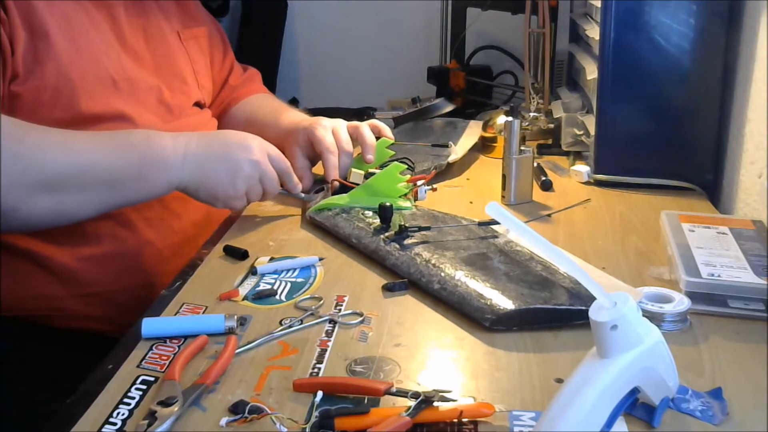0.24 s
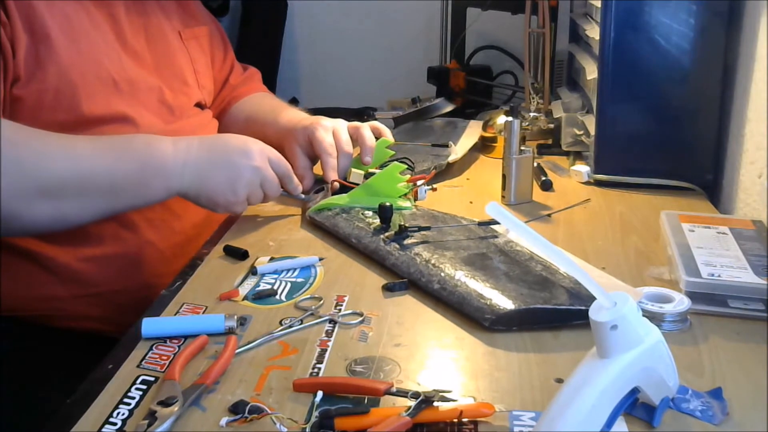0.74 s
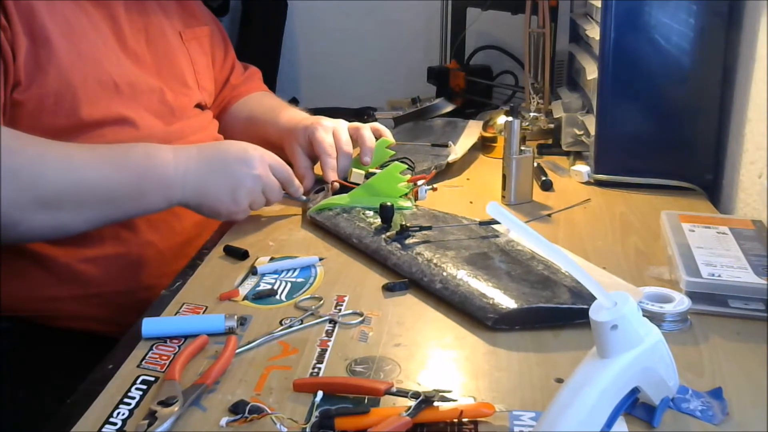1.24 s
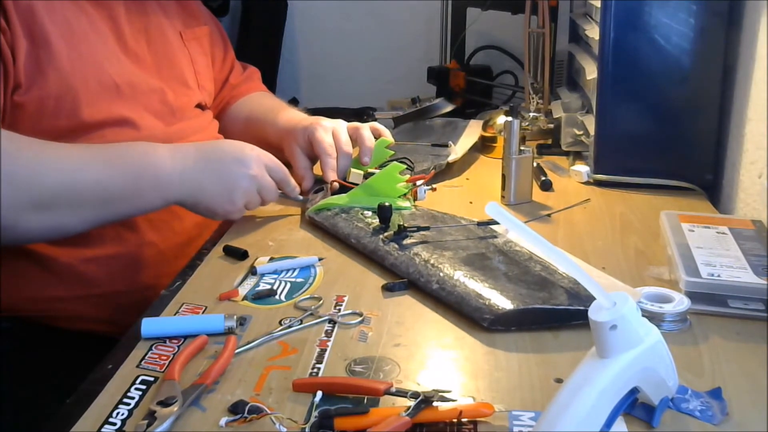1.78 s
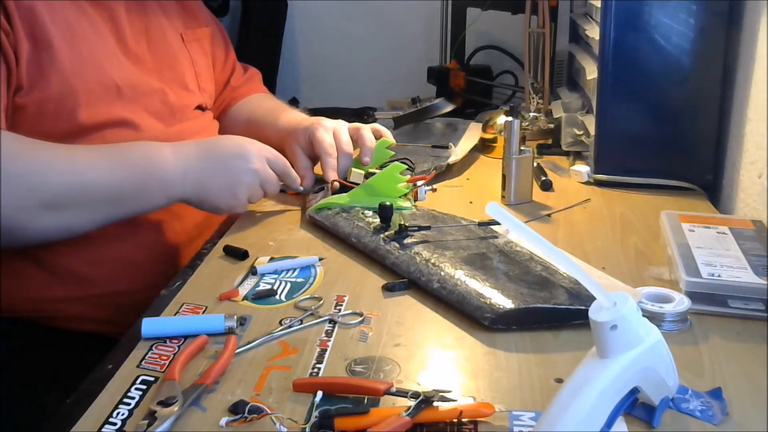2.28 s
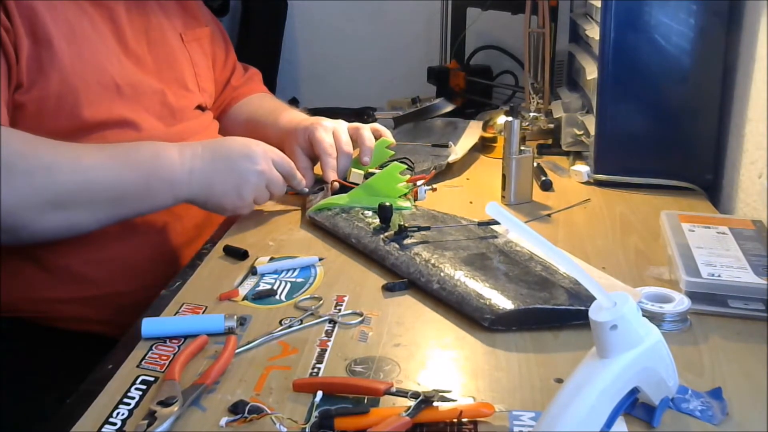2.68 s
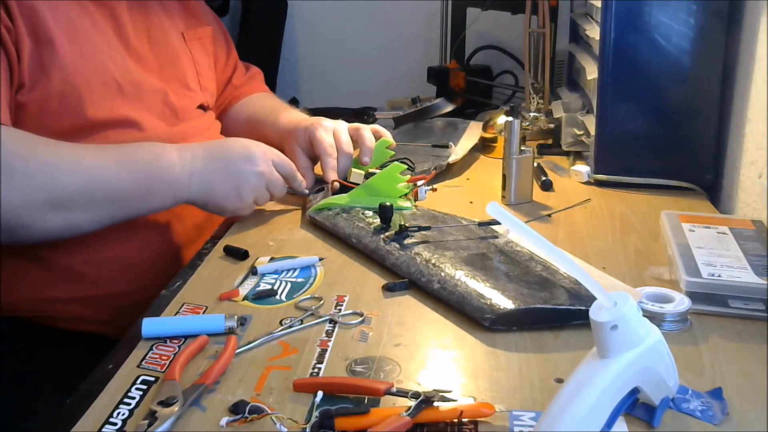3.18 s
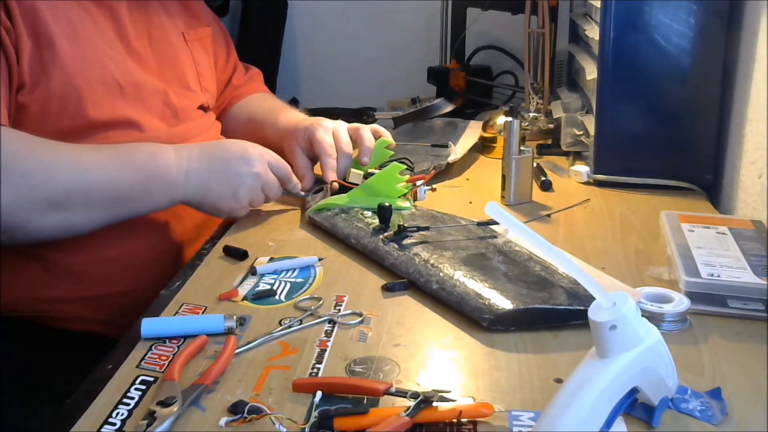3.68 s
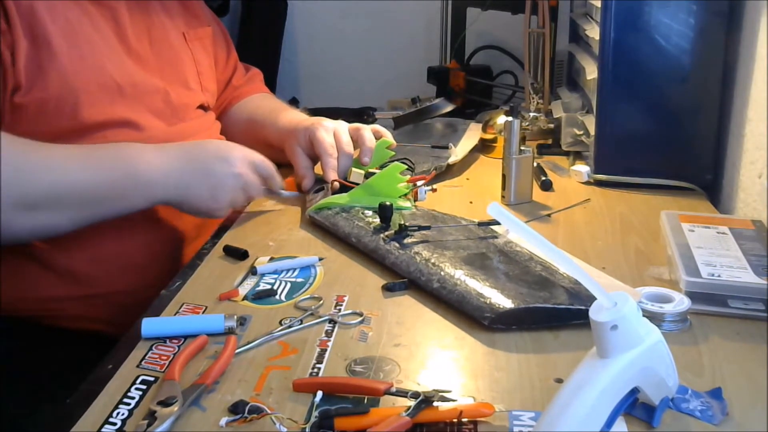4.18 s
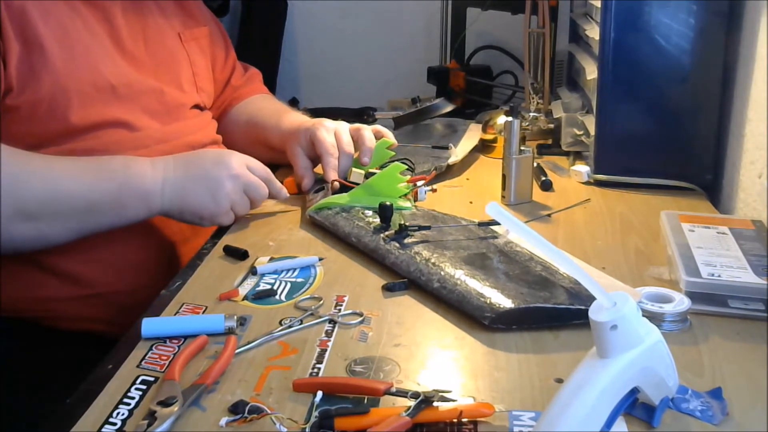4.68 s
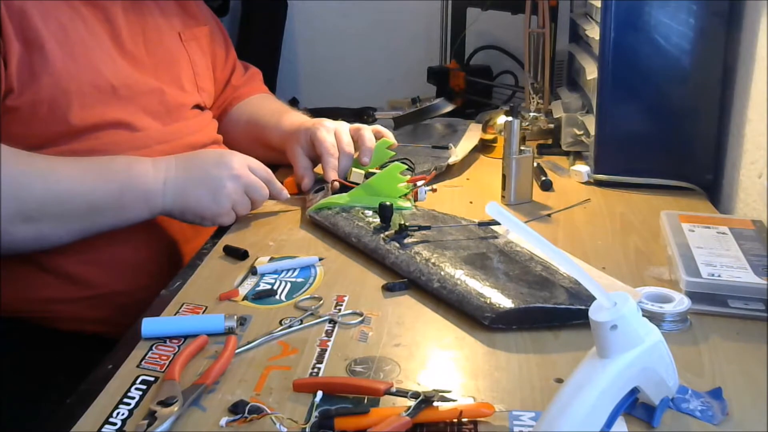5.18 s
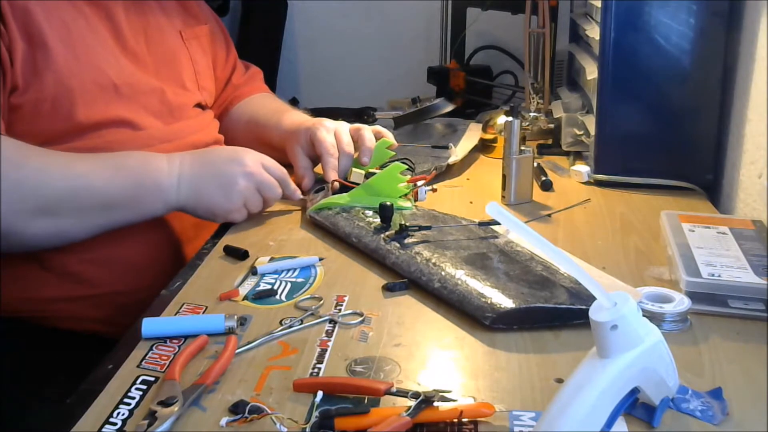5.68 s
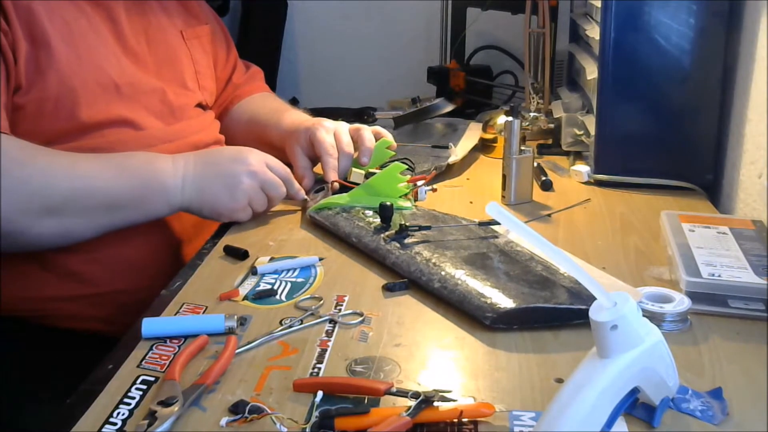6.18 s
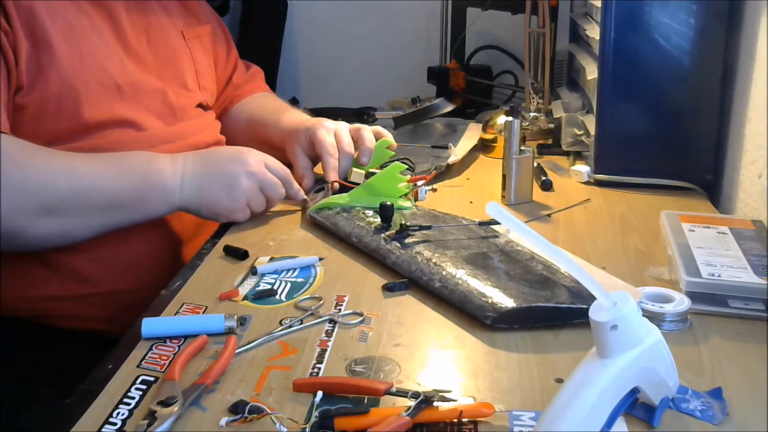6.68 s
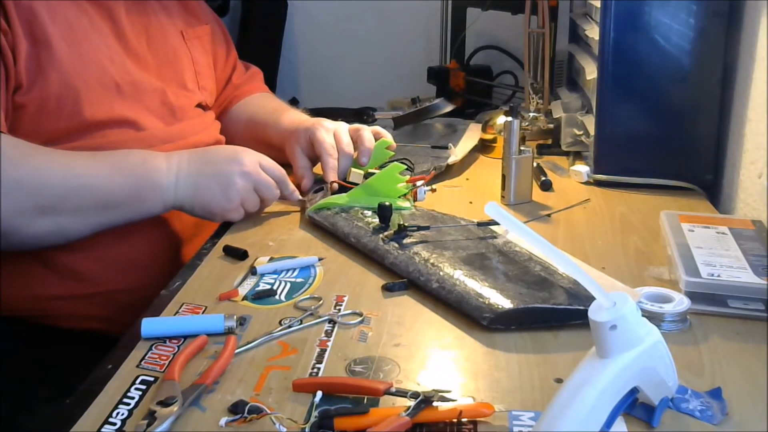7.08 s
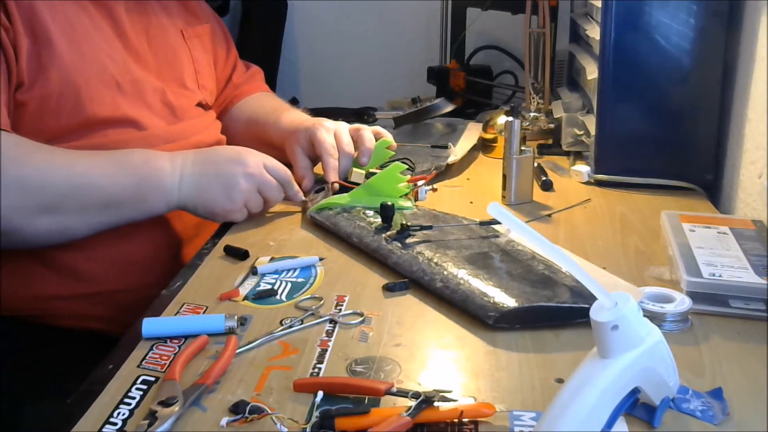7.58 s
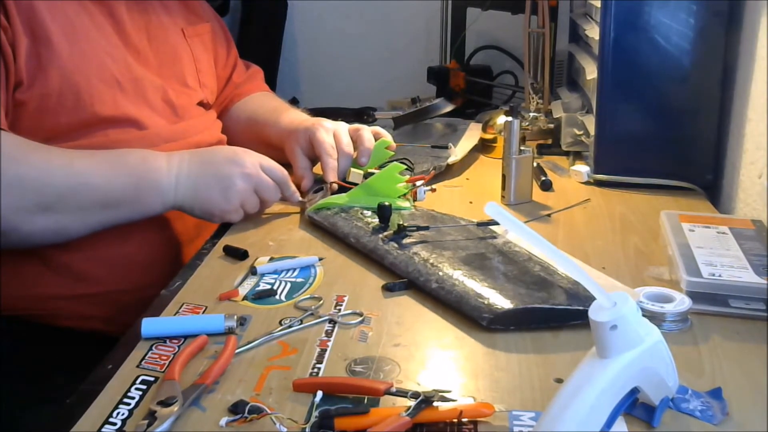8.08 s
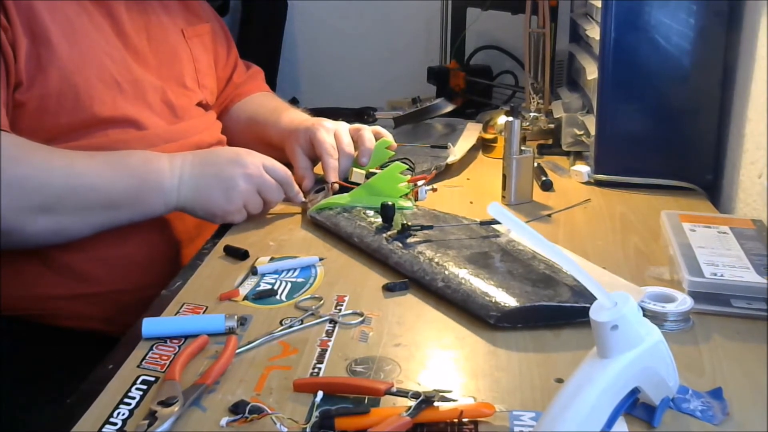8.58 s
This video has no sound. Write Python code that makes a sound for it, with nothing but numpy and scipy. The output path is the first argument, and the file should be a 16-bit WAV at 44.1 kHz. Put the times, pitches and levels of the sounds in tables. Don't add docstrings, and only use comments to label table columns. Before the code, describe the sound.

Close, dry workshop cutting: grainy foam sawing, sharp little cracks and ripping jerks, then quicker scraping with gentle bench knocks over a faint machine hum.

```python
import sys
import numpy as np
from scipy import signal
from scipy.fft import rfft, irfft
from scipy.io import wavfile
from scipy.ndimage import uniform_filter1d, map_coordinates

SR = 44100
rng = np.random.default_rng(int(sys.argv[2]) if len(sys.argv) > 2 else 0)


def wav_out(sig):
    wavfile.write(sys.argv[1], SR, np.round(np.clip(np.atleast_2d(sig).T, -1, 1) * 32767).astype(np.int16))


def boost(x):
    u = np.asarray(x, float) / 20
    return 10 ** u


N = 390285

# pitch_hz, level_db (per Hz)
HUM_COLOUR = [(12, -49), (20, -26), (90, -18), (109, -12), (232, -7.5), (259, -6.5), (333, -10.5),
              (405, -11), (506, -15), (707, -18), (934, -19.5), (8920, -34.5), (15600, -49.5)]
# pitch_hz, time_to_fall_60_db_s
ROOM_RING = [(500, 0.074), (2000, 0.11), (6500, 0.075), (12000, 0.1)]

# pitch_hz, level_db, time_to_fall_60_db_s
BOARD_TONES = [(382, 2, 0.11), (460.6, 4, 0.098), (323, -4, 0.19), (558.4, -8.5, 0.27)]
# pitch_hz, level_db, time_to_fall_60_db_s
FRAME_TONES = [(137, -2, 0.47), (198, 4.5, .2)]
# pitch_hz, level_db (per Hz)
GRIT_COLOUR = [(90, -30.5), (200, -5.5), (450, 4), (900, -4.5), (1500, -14.5), (3000, -37)]
# start_s, board_peak_db, frame_db, part_db
KNOCKS = [(0.365, -45, -23, 5.5), (0.467, -40, -18, -35), (0.546, -51, -21, 2.5), (0.732, -46.5, -4, -6),
          (0.786, -38.5, -17, 3.5), (0.946, -51, -9, -1), (0.991, -49.5, -39, -2), (1.204, -42.5, -20, 4),
          (1.239, -57, 1, 5.5), (1.388, -45.5, -6, -4.5), (1.451, -51.5, -22, -6.5), (1.542, -56, -27, -26),
          (1.566, -59, -5, -18), (2.792, -42, -12, -18), (3.088, -47.5, -4, -1), (3.446, -55, 3, 0.5),
          (3.582, -52.5, -7, -26), (3.641, -48.5, -4, 1), (3.759, -56, -19, -4), (3.822, -47.5, 4, -13.5),
          (4.031, -53.5, -32, -40.5), (5.755, -52.5, -13, -18.5), (5.856, -44.5, -19, -18),
          (5.946, -54, -10, -26), (6.668, -55, -23, -5.5)]
# start_s, board_peak_db, frame_db
ROCKING_KNOCKS = [(7.01, -46.5, -8.5), (7.186, -41.5, -7.5), (7.329, -50.5, -22), (7.469, -29.5, -7.5),
                  (7.654, -42.5, -1), (7.796, -30, -11), (7.959, -38, -8), (8.121, -28, -14),
                  (8.297, -45, -1), (8.459, -32, -18.5), (8.704, -55.5, 2.5)]
# start_s, peak_db, pitch_hz
PART_TAPS = [(.527, -46, 900), (.675, -58, 623), (0.71, -42, 726), (0.828, -37.5, 753), (2.689, -70, 720),
             (3.669, -47.5, 884), (4.253, -60, 696), (4.559, -63, 713), (4.668, -49, 854),
             (6.297, -52, 740), (6.447, -55.5, 717), (7.365, -45, 880), (7.777, -44, 833),
             (8.092, -49, 714), (8.401, -48, 764)]
# start_s, peak_db
FRAME_THUDS = [
    (.27, -56),
    (0.712, -55),
    (2.971, -62),
    (3.07, -53),
    (4.23, -57.5),
    (5.335, -63),
    (5.997, -54),
    (6.224, -61),
    (6.447, -60),
    (8.402, -52),
]

# pitch_hz, level_db (per Hz)
CRACK_COLOUR = [(1060, -51), (1800, -32.5), (2610, -12), (3540, -8), (5610, -1), (6720, 0.5), (9310, -16.5),
                (12800, -60), (14700, -54), (15600, -100)]
# start_s, peak_db, dull_part_db
FIBRE_SNAPS = [(0.8187, -14, -2), (1.1818, -41.5, 2.5), (1.2099, -10.5, -7), (2.3634, -15.5, -12.5),
               (2.392, -15.5, -5.5), (2.7954, -14.5, -24), (3.2838, -49, -8), (3.83, -12, -10.5),
               (4.0688, -21.5, -4.5), (4.1153, -15.5, -12.5), (5.6409, -15, -6), (6.099, -23.5, -11),
               (6.4731, -23.5, -20), (6.7143, -22.5, 2.8), (6.8154, -27.5, -7), (7.3278, -19.5, -11),
               (7.437, -34, -10), (7.468, -9.5, -9.5), (7.818, -13, -3), (7.975, -41, 9),
               (8.4615, -32.5, 12.7), (8.752, -39.5, -21)]
# start_s, peak_db
THIN_TICKS = [(0.1319, -33), (0.2213, -22.5), (0.3301, -44), (0.5815, -27), (0.5934, -12), (2.4834, -12),
              (2.8976, -33), (3.4745, -45), (3.9004, -38), (5.25, -33), (5.341, -30), (5.3695, -30),
              (5.3921, -30), (5.4085, -35), (5.4456, -33), (5.478, -32), (6.0038, -32), (6.694, -26),
              (7.1386, -24.5), (8.3025, -37), (8.7722, -15.5)]
# start_s, snap_db, tearing_db, run_out_s, weight_on_part_db
RIPS = [(1.8403, -6.5, -35.5, 0.082, -8), (2.444, -3.5, -36, .15, -7.5), (2.7504, 0.5, -33, 0.12, -12),
        (3.0985, 1, -30, 0.12, -14), (3.1615, 0.5, -34.5, 0.11, -15.5), (3.3529, -15.5, -35.5, 0.065, -4.5),
        (4.6182, -8.5, -40, 0.11, -6), (5.23, -28.5, -42.5, 0.082, -18), (5.2844, -12, -45.5, 0.11, -16.5),
        (8.1228, -25, -44.5, 0.062, 9.5), (8.7905, -4, -40.5, 0.34, -5.5)]

# pitch_hz, level_db (per Hz)
CELL_COLOUR = [(2000, -97), (4200, -5.5), (4900, 4), (5600, 5.5), (6500, 9), (7600, 1.5), (9000, -7),
               (11000, -52.5), (14000, -94.5)]
# pitch_hz, level_db (per Hz)
DRAG_COLOUR = [(200, -88.5), (560, -30.5), (850, -9.5), (1100, -9.5), (1450, -1.5), (1800, -9), (2200, -10),
               (3000, -32), (6000, -88)]
# pitch_hz, level_db (per Hz)
BLADE_COLOUR = [(800, -95.5), (1700, -45.5), (2300, -13), (2650, -9), (2900, -7.5), (3250, -7),
                (3800, -8.5), (4500, -7), (5500, -31), (9000, -93.5)]
# pitch_hz, level_db (per Hz)
FIZZ_COLOUR = [(5000, -86.5), (8000, -20.5), (9500, 11), (10500, -2), (12500, -16), (14500, -20),
               (15700, -28)]
# start_s, rise_s, hold_s, tearing_db, weight_on_part_db
BLADE_STROKES = [(0, 0.0007, 0.0009, -39.5, -11.5), (.11, 0.031, 0.001, -27.5, -17.5),
                 (0.309, 0.033, 0.03, -32, -10), (0.545, 0.036, 0.0067, -32, -13.5), (0.701, 0.1, 0.001, -61.5, 2),
                 (0.802, 0.017, 0.014, -45, -4), (0.961, .03, 0.051, -55, -5), (1.165, 0.043, 0.028, -37.5, -9),
                 (1.383, 0.036, 0.001, -73.5, 16), (1.605, 0.058, 0.21, -47.5, -4.5),
                 (2.268, 0.018, 0.025, -67, -41), (2.334, 0.043, 0.048, -42.5, -15.5),
                 (2.882, .03, 0.043, -37.5, -15), (3.036, 0.054, 0.001, -46.5, -34),
                 (3.265, 0.022, 0.038, -35, -19.5), (3.434, .048, 0.028, -43, -19.5),
                 (3.636, .038, 0.0014, -49, -7), (3.819, 0.0032, 0.1, -45, -17), (3.997, 0.086, 0.028, -39, -19),
                 (5.386, 0.026, 0.005, -41.5, -26), (5.47, 0.0074, .04, -40, -21),
            (5.453, 0.096, 0.11, -35.5, -12.5), (5.704, 0.0099, 0.1, -51, -50),
            (5.741, .11, 0.027, -48.5, -51), (5.983, 0.036, 0.077, -37.5, -10.5),
            (6.267, 0.015, 0.093, -68, -4), (6.428, 0.069, 0.001, -42.5, -10.5),
            (6.64, 0.07, 0.013, -48, -12.5), (6.797, 0.018, 0.031, -42, -10.5),
            (6.989, 0.028, 0.021, -43.5, -10.5), (7.126, 0.046, 0.022, -39, -6.5),
            (7.307, 0.026, 0.038, -46, -9), (7.441, 0.042, 0.034, -37, -5.5),
            (7.606, 0.054, 0.034, -42.5, -15.5), (7.74, 0.07, 0.012, -32, -10),
            (7.955, 0.031, 0.00087, -43, -8), (8.252, 0.071, 0.0011, -50, -6.5),
            (8.372, 0.12, 0.031, -43, -10.5), (8.573, 0.017, 0.15, -67, -16),
            (8.762, 0.012, 0.006, -43.5, -11)]

HUM_DB, HISS_DB = -67.5, -85.5
ROCK_PART_DB, PART_HZ, ASIDE_DB = -8.5, (651, 919), 14.5
GRIT_DB, GRIT_T60_S = -11, 0.21
TICK_DULL_DB, DULL_DB, DULL_FOLLOWS = -26, -3.5, 1.16
TOUCH_DB, REST_DB = -65, -73.5
SAG_DB_PER_S, RELEASE_PER_S = 22, 2.67
FREE_S = 0.0048
BLADE_DB, BLADE_FOLLOWS = -0.75, 0.36
FIZZ_DB, FIZZ_FOLLOWS = -19.5, 0.29
BANDS_DB = 2.5


def unit(x):
    return x / np.sqrt(np.mean(x ** 2) + 1e-20)


def along(points, hz):
    f, v = np.transpose(points)
    return np.interp(np.log(hz + 1), np.log(f + 1), v)


def wobble(rate):
    knots = rng.standard_normal(int(N * rate / SR) + 4)
    return map_coordinates(knots, [np.arange(N) * rate / SR])


def response(spectrum, size=1024):
    gain = np.maximum(boost(along(spectrum, np.fft.rfftfreq(size, 1 / SR))), 1e-4)
    cepstrum = irfft(np.log(gain))
    cepstrum[1:size // 2] *= 2
    cepstrum[size // 2 + 1:] = 0
    h = irfft(np.exp(rfft(cepstrum)))
    return h / np.linalg.norm(h)


def coloured(x, spectrum, size=1024):
    return signal.fftconvolve(x, response(spectrum, size=size))[:len(x)]


def tail(fade):
    hz, t, z = signal.stft(rng.standard_normal(SR // 5), SR, nperseg=128)
    decay_db = -60 * t / along(ROOM_RING, hz)[:, None] - 20 * (t / fade) ** 4
    h = signal.istft(z * boost(decay_db), SR, nperseg=128)[1]
    h[:260] *= .3
    h[260] += 4 * np.std(h[260:900])
    return h / np.linalg.norm(h)


def hum():
    steady = coloured(rng.standard_normal(N), HUM_COLOUR, size=4096)
    hiss = boost(HISS_DB) * rng.standard_normal(N)
    return boost(HUM_DB + 1.1 * wobble(6.3)) * steady + hiss


def ring(tones, t, wander=.05):
    def drift():
        return map_coordinates(rng.standard_normal(40), [70 * t])

    out = np.zeros(len(t))
    for hz, db, t60 in tones:
        level_db = db + rng.normal(0, 2.5) + 5.1 * drift() - 60 * t / t60
        phase = 2 * np.pi * hz * np.cumsum(1 + wander * drift()) / SR
        out += boost(level_db) * np.sin(phase)
    return out


def contacts():
    rocking = [(*row, ROCK_PART_DB) for row in ROCKING_KNOCKS]
    thuds = [(s, db - ASIDE_DB, ASIDE_DB, 0) for s, db in FRAME_THUDS]
    taps = [(s, db - ASIDE_DB, -ASIDE_DB, ASIDE_DB, hz) for s, db, hz in PART_TAPS]
    knocks = KNOCKS + rocking + thuds
    pitches = rng.uniform(*PART_HZ, len(knocks))
    return [(*row, hz) for row, hz in zip(knocks, pitches)] + taps


def bench():
    out, t = np.zeros(N + SR), np.arange(SR // 6) / SR
    cut = boost(-20 * (t / .085) ** 4)
    for s, db, frame_db, part_db, part_hz in contacts():
        board = ring(BOARD_TONES, t) * (1 - np.exp(-t / 0.0021))
        frame = boost(frame_db + 2.0) * ring(FRAME_TONES, t) * (1 - np.exp(-t / 0.0085))
        part_tones = [(part_hz, 0, .16), (0.77 * part_hz, -9, .07)]
        part = boost(part_db + 5.0) * ring(part_tones, t, wander=0.03) * (1 - np.exp(-t / 0.0033))
        grind = boost(6 * map_coordinates(rng.standard_normal(40), [120 * t])) * rng.standard_normal(len(t))
        grit_db = GRIT_DB + .3 * max(part_db, 0) - 60 * t / GRIT_T60_S
        grit = boost(grit_db) * coloured(grind, GRIT_COLOUR)
        out[round(s * SR):][:len(t)] += boost(db - 5.0) * (board + frame + part + grit) * cut
    return out[:N]


def fibres():
    rips = [(s, db, DULL_DB + DULL_FOLLOWS * part_db) for s, db, _, _, part_db in RIPS]
    ticks = [(s, db, TICK_DULL_DB) for s, db in THIN_TICKS]
    return rips + FIBRE_SNAPS + ticks


def snaps():
    out, t = np.zeros(N + SR), np.arange(SR // 100) / SR
    sharp = response(CRACK_COLOUR) + boost(-24) * response(FIZZ_COLOUR)
    blunt = response(DRAG_COLOUR) + 0.78 * response(BLADE_COLOUR)
    for s, db, dull_db in fibres():
        jolt = .3 * boost(-20 * (t / .0028) ** 2) * rng.standard_normal(len(t))
        jolt[0] = 2.2
        hit = np.convolve(jolt, sharp + boost(dull_db - 2) * blunt)
        heard = signal.fftconvolve(hit, boost(-1.5) * tail(fade=.11))
        heard[:len(hit)] += hit
        out[round(s * SR):][:len(heard)] += boost(db - 4.5) * heard
    return out[:N]


def strokes():
    force, moves = np.zeros((4, N)), []
    for s, rise, hold, db, part_db in BLADE_STROKES:
        end_db = db - SAG_DB_PER_S * hold
        fall = max(boost(.3 * end_db) - boost(0.28 * REST_DB), .02) / RELEASE_PER_S
        levels_db = [min(TOUCH_DB, db - 11.5), db, end_db, REST_DB]
        moves.append((np.cumsum([s, rise, hold, fall]), levels_db, db, part_db))
    for s, _, db, run_out, part_db in RIPS:
        moves.append((np.cumsum([s + FREE_S, run_out]), [db, REST_DB], db, part_db))
    for s, levels_db, db, part_db in moves:
        span = np.arange(max(round(s[0] * SR), 0), min(round(s[-1] * SR), N))
        swing = np.interp(span / SR, s, boost(.3 * np.array(levels_db))) ** (1 / .3)
        hard = (swing / swing.max()) ** np.array([[0], [.4], [.08], [.35]])
        blade_db = BLADE_DB + BLADE_FOLLOWS * part_db
        fizz_db = FIZZ_DB + FIZZ_FOLLOWS * (db + 26.5)
        grip = boost([0, part_db, blade_db, fizz_db])[:, None]
        force[:, span] = np.maximum(force[:, span], swing * hard * grip)
    return uniform_filter1d(force, size=150, axis=1)


def patchy(x, depth_db):
    z = signal.stft(x, nperseg=256)[2]

    def smooth(wide, long):
        across = uniform_filter1d(rng.standard_normal(z.shape), size=wide, axis=0)
        return unit(uniform_filter1d(across, size=long, axis=1))

    change_db = depth_db * smooth(3, 12) + BANDS_DB * smooth(4, 40)
    return signal.istft(z * boost(change_db), nperseg=256)[1][:len(x)]


def tearing():
    chance = rng.random(N)
    size = np.minimum(rng.exponential(size=N), 2.5)
    burst_now = chance < 500 * boost(4 * wobble(40)) / SR
    bursts = unit(burst_now * boost(3 * size) * np.sign(rng.standard_normal(N)))
    bodies = [CELL_COLOUR, DRAG_COLOUR, BLADE_COLOUR, FIZZ_COLOUR]
    burst_shares = [.9, .6, .9, 1.1]
    out = np.zeros(N)
    for force, body, share in zip(strokes(), bodies, burst_shares):
        unevenness = boost(2.1 * wobble(60) + 1.2 * wobble(200))
        rub = unit(share * bursts + rng.standard_normal(N)) * unevenness
        out += coloured(force * rub, body)
    return out


def scene():
    tear = patchy(tearing(), depth_db=1.5)
    wet = boost(-7) * signal.fftconvolve(tear, tail(fade=0.15))[:N]
    linger = signal.lfilter([1e-4], [1, 1e-4 - 1], np.minimum(np.abs(tear), boost(-45)))
    glow = boost(-23.0) * linger * coloured(rng.standard_normal(N), CELL_COLOUR)
    return (hum() + bench() + snaps() + tear + wet + glow)[None]


def top_cut(x):
    return signal.sosfilt(signal.butter(12, 15720, fs=SR, output="sos"), x)


def record(dry):
    thin = signal.sosfilt(signal.butter(2, 60, "high", fs=SR, output="sos"), dry)
    return top_cut(thin)


dry = scene()
out = record(dry)
wav_out(out)
```